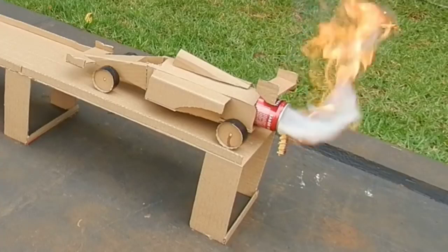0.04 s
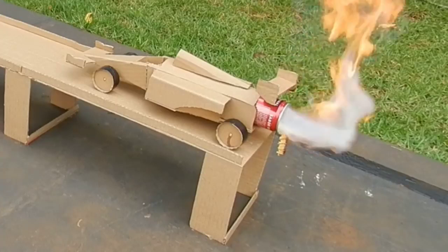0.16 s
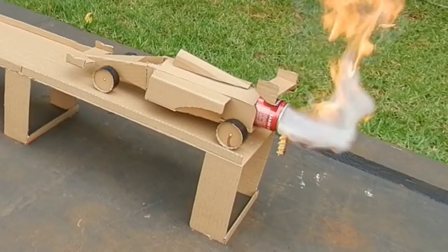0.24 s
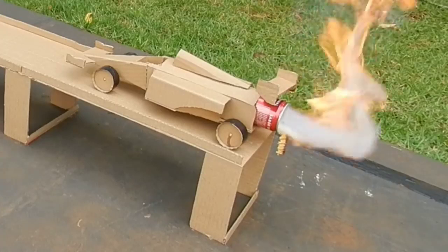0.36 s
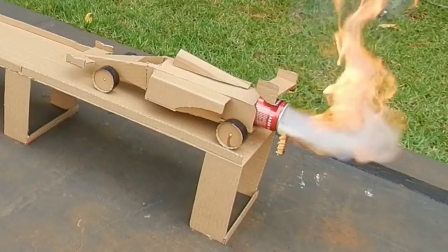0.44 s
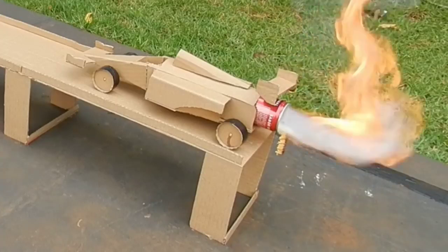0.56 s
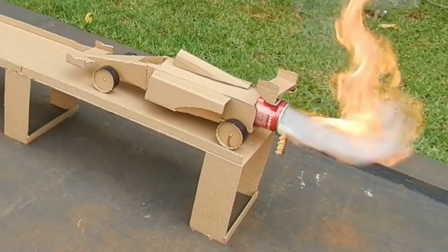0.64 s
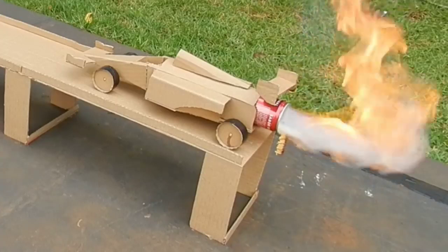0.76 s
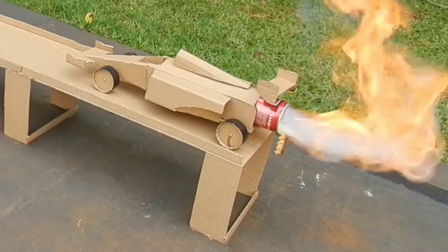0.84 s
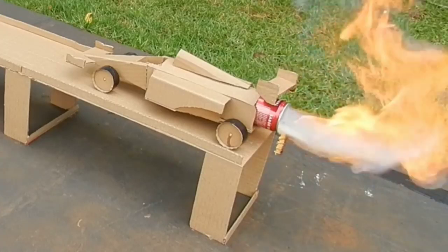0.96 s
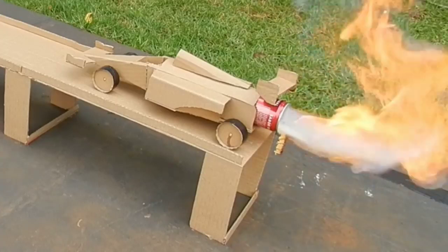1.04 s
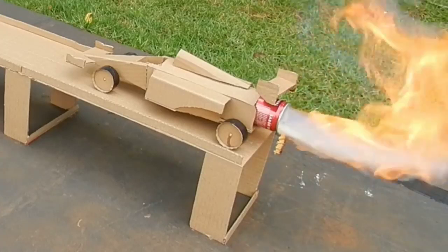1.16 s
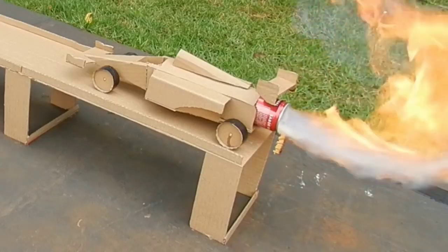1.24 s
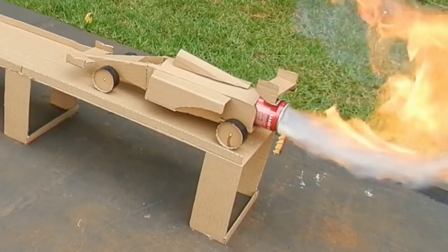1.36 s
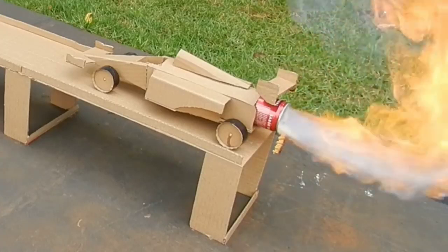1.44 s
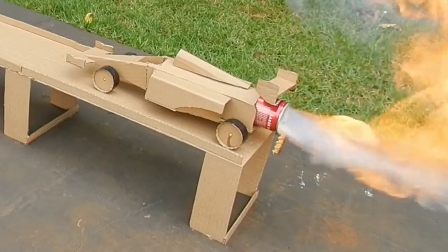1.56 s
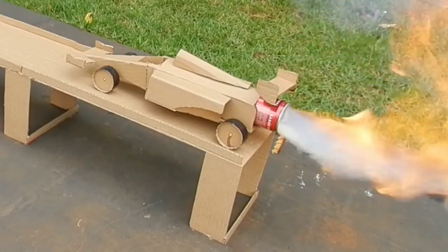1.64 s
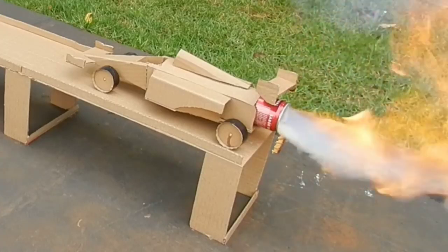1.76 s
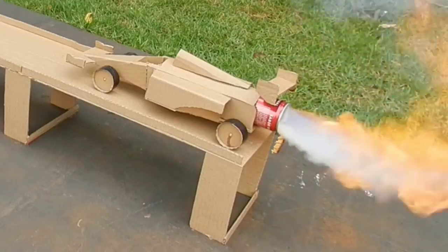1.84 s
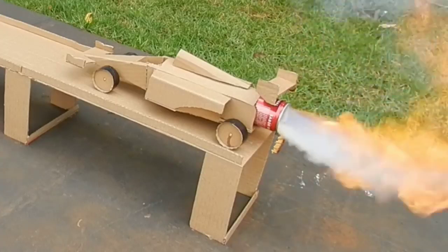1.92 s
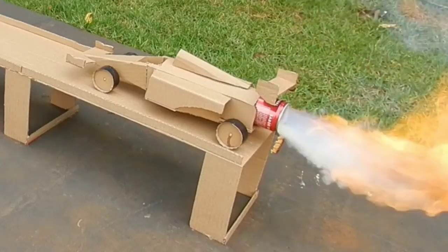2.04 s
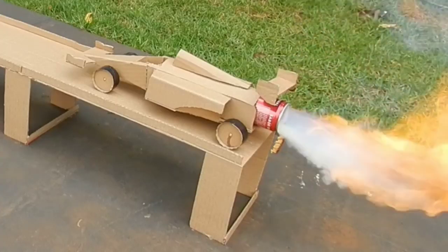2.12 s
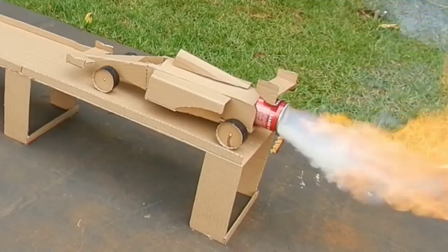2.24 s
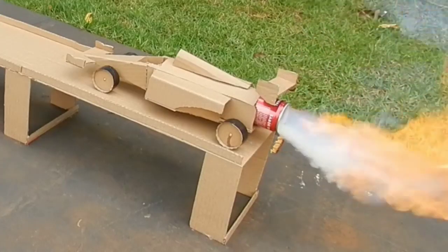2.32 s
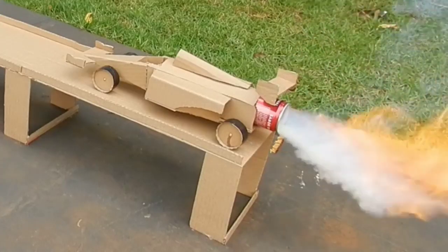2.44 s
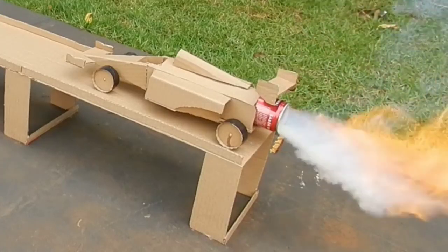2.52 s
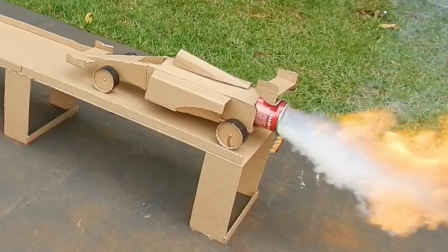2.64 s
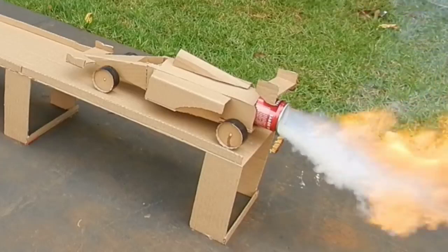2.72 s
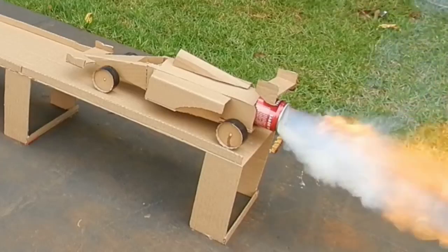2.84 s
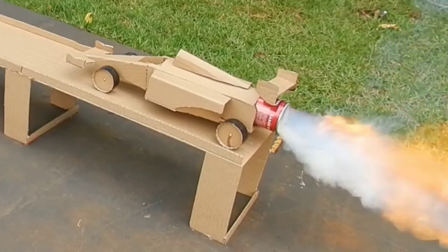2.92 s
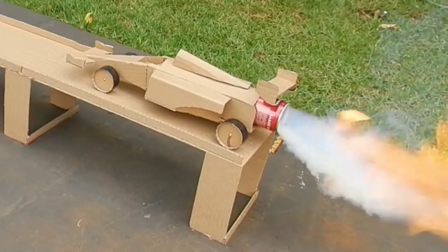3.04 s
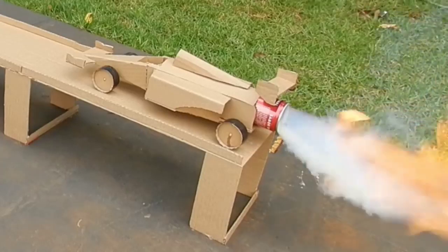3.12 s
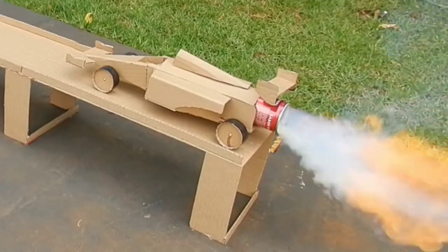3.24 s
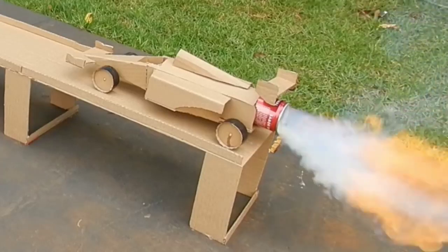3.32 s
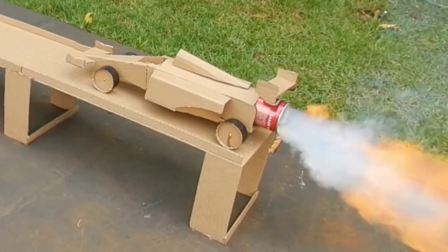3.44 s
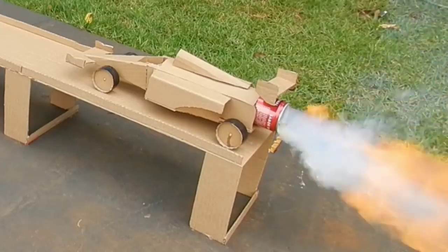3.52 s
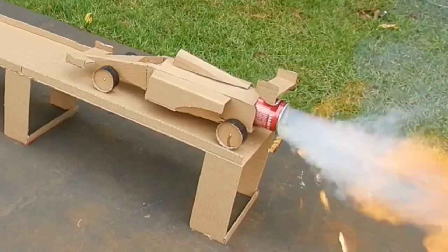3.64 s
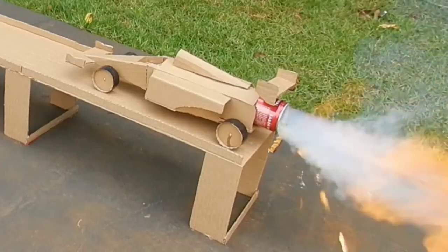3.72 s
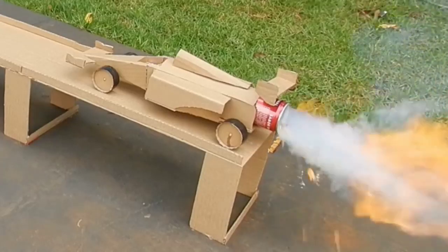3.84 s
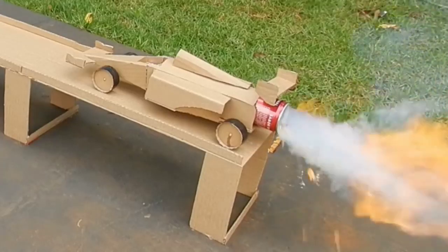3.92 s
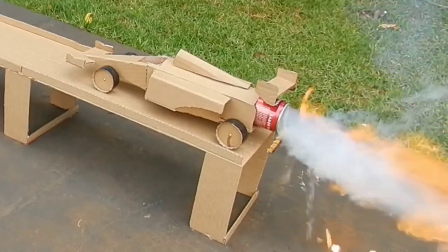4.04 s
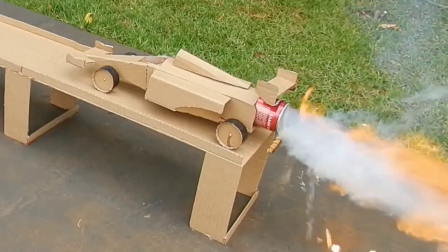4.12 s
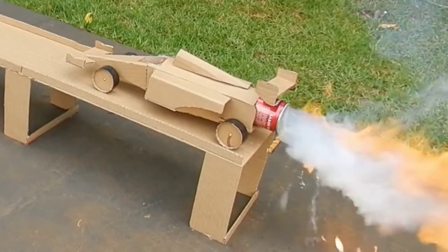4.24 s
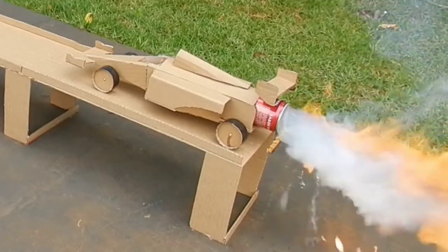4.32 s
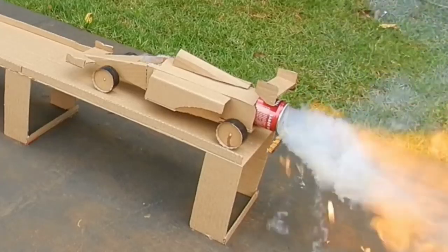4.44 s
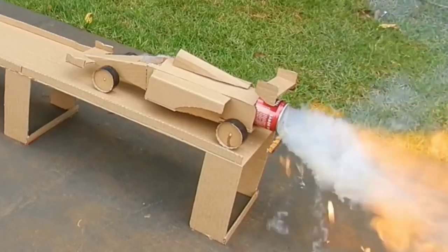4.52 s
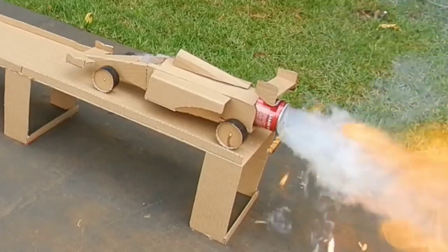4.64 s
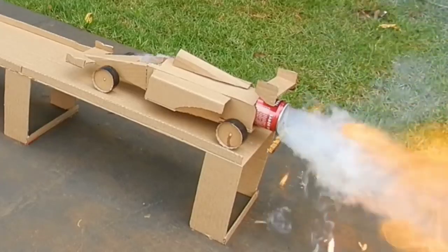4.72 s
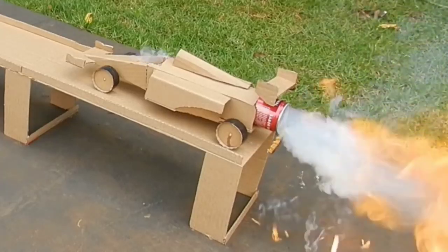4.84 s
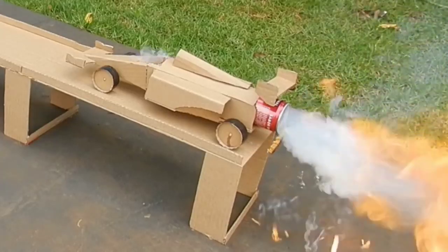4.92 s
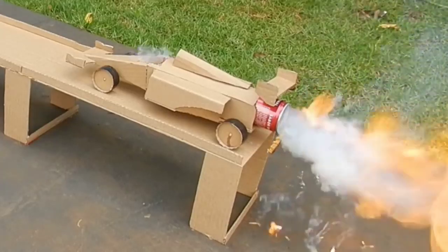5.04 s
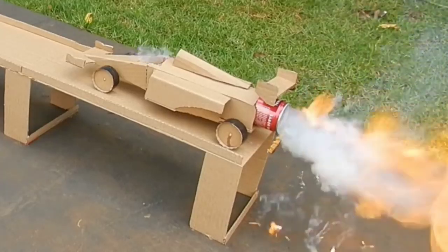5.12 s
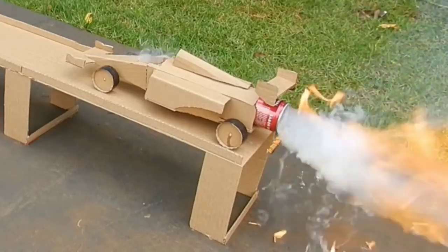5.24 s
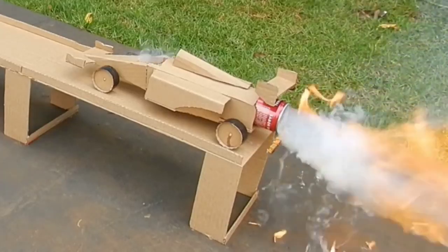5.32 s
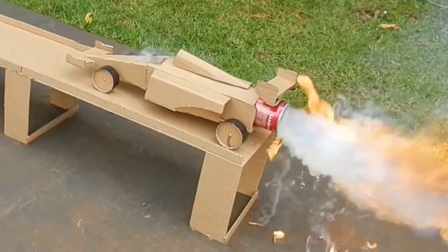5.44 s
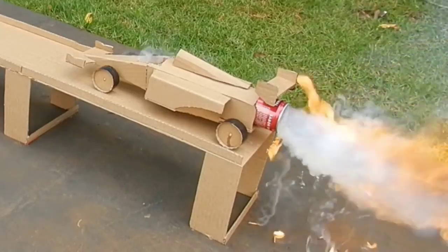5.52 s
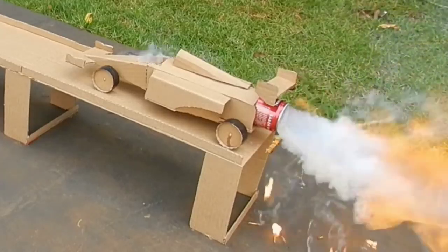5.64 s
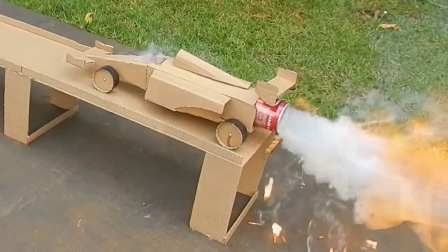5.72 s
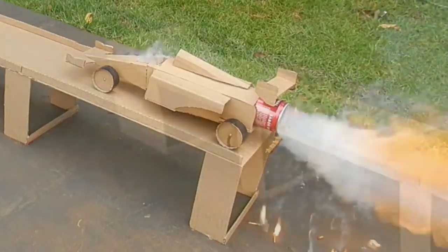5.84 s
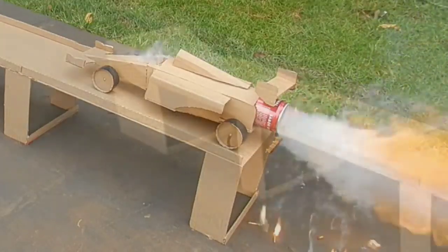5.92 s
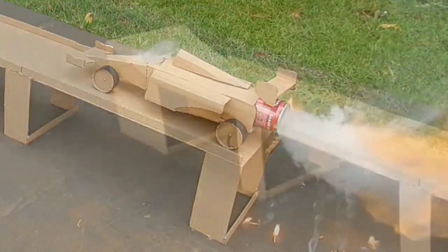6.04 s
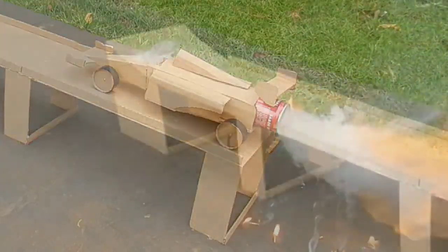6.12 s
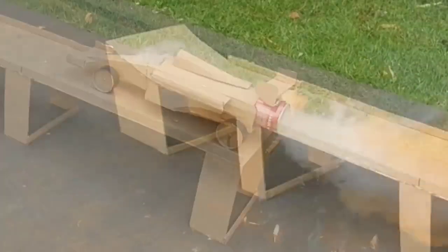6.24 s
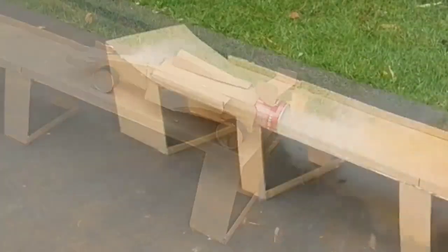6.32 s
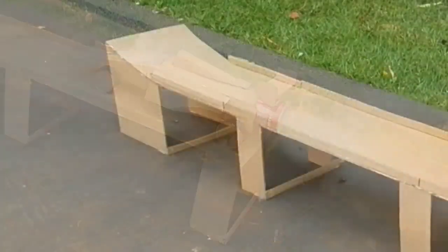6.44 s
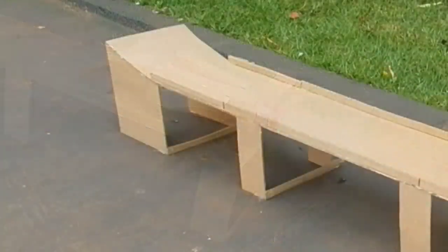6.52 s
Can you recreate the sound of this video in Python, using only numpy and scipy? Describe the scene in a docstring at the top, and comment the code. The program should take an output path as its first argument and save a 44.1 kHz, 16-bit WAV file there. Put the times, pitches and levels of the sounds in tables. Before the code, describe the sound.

A burning can's jet is heard close by in the open, slowed down: a turbulent mid-range rush, low cavity drones and a breathy note at the mouth. Flame rumble builds in irregular heavy puffs, with rare short crackles and a thin fizz on top. After peaking it fades down, then a sudden switch to faint normal-speed outdoor air carries a single dull, soft thud. Stereo microphone, dry, no echo.

```python
"""A can of burning propellant jets flame from the back of a cardboard car, outdoors, heard in slow motion.
The flame rumbles as lumps of noise; two resonances drone in the can's cavity and one breathes at its mouth.
The jet rushes as turbulent noise and spits short crackling puffs.
Slowed playback holds each sample, mirroring the roar into a thin fizz; at the end, open-air noise
cuts in at normal speed with one soft low bump."""
import sys
import numpy as np
from scipy import signal
from scipy.fft import rfft, irfft, next_fast_len
from scipy.io import wavfile
from scipy.ndimage import uniform_filter1d, map_coordinates

SR = 44100
rng = np.random.default_rng(int(sys.argv[2]) if len(sys.argv) > 2 else 0)


def log_audio(samples):
    """Write samples as a 16-bit WAV file to the path given in sys.argv[1]."""
    # one column per channel
    frames = np.atleast_2d(samples).T
    # limit to full scale, then quantise
    limited = np.clip(frames, -1, 1)
    pcm = np.round(limited * 32767).astype(np.int16)
    wavfile.write(sys.argv[1], SR, pcm)


N = 289990

# The flame catches, spreads and shrinks: (time [s], size [dB re full])
FLAME_SIZE = [(0, -22), (.8, -20), (1.15, -17.5), (1.45, -8), (1.9, -5.5), (2.45, -5.5), (3.0, -5),
              (3.5, -2), (4.7, -1.3), (5.35, -4), (5.8, -8), (6.1, -17.5), (6.44, -16)]
# The outflow builds, holds and dies away: (time [s], strength [dB re full])
OUTFLOW = [(0, -4), (.6, -1.5), (1.9, -0.76), (2.68, -0.5), (3.05, -1.5), (3.4, 0), (5.05, -1), (5.8, -4.5),
           (6.1, -9.5), (6.42, -15)]


def amp(db):
    """Amplitude ratio: twenty decibels are a factor of ten."""
    return 10 ** (np.asarray(db) / 20)


def unit(x):
    """Normalization: x scaled to rms 1."""
    return x / np.sqrt(np.mean(x ** 2) + 1e-20)


def along(points, hz):
    """Logarithmic frequency scale: each column of a (frequency, ...) table interpolated at hz."""
    f, *cols = np.transpose(points)
    return [np.interp(np.log(hz + 1), np.log(f + 1), c) for c in cols]


def curves(rows):
    """Linear interpolation in time: one value per sample for each column after the time."""
    s, *cols = np.transpose(rows)
    return [np.interp(np.arange(N) / SR, s, c) for c in cols]


def wobble(rate):
    """Slow random modulation: a smooth curve through rate random knots a second."""
    knots = rng.standard_normal(int(N * rate / SR) + 4)
    return map_coordinates(knots, [np.arange(N) * rate / SR])


def swells(rows):
    """Gaussian bumps in dB from (time, length, dB) rows; the length is the width at half height."""
    t = np.arange(N) / SR
    return sum(db * .5 ** ((2 * (t - s) / length) ** 2) for s, length, db in rows)


def filtered(x, response):
    """Linear filtering: the spectrum of x times a complex response of frequency."""
    m = next_fast_len(N + SR // 2)  # padding limits wrap-around
    return irfft(rfft(x, m) * response(np.fft.rfftfreq(m, 1 / SR)), m)[..., :N]


def noise(response):
    """Filtered white noise: an unrelated pair of joint rms 1."""
    return unit(filtered(rng.standard_normal((2, N)), response))


def coloured(spectrum):
    """Spectral density: an unrelated noise pair shaped by a (frequency, dB) table."""
    return noise(lambda hz: amp(along(spectrum, hz)[0]))


def halves(spectrum, split_hz):
    """Band splitting: noise below and noise above a crossover in one spectrum, each of rms 1."""
    colour = lambda hz: amp(along(spectrum, hz)[0])
    low = noise(lambda hz: colour(hz) / np.sqrt(1 + (hz / split_hz) ** 10))
    high = noise(lambda hz: colour(hz) / np.sqrt(1 + (split_hz / (hz + 1)) ** 10))
    return low, high


def even(x, span):
    """Level equalization: swells slower than span seconds are divided out."""
    power = uniform_filter1d(x ** 2, max(3, int(span * SR)), axis=-1)
    return unit(x / np.sqrt(np.abs(power) + .05 * np.mean(x ** 2)))


def patchy(x, depth_db):
    """Time-frequency modulation: narrow streaks of colour come and go in the noise."""
    z = signal.stft(x, nperseg=2048)[2]
    field = rng.standard_normal(z.shape[1:])
    field = uniform_filter1d(field, size=3, axis=0)  # across frequency
    field = uniform_filter1d(field, size=5, axis=1)  # along time
    return unit(signal.istft(z * amp(depth_db * unit(field)), nperseg=2048)[1][:, :N])


def resonance(centre_hz, width_hz, skirt=1.99):
    """A mode stirred by turbulence: strength and phase wander at a rate set by its bandwidth."""
    phase = 2 * np.pi * np.cumsum(centre_hz) / SR
    mean_width_hz = width_hz.mean()
    clock = np.cumsum(width_hz / mean_width_hz)  # runs faster while the mode is wider

    def stir():
        pair = noise(lambda hz: 1 / (1 + (hz / mean_width_hz) ** skirt))
        return np.array([np.interp(clock, np.arange(N), row) for row in pair])

    return unit(stir() * np.cos(phase) + stir() * np.sin(phase))


def outdoors(width=0.38, floor_db=-76):
    """Ambient noise: a partly shared stereo field jumps up and settles, over a faint steady white hiss."""
    # Open air with a hollow middle band: (frequency [Hz], density [dB per Hz])
    air_spectrum = [(24, -57), (40, -21), (80, -15), (108, -8.5), (160, -14.5), (186, -17.5), (257, -15),
                    (502, -28), (760, -31.5), (880, -24.5), (1020, -22), (1200, -29), (1500, -34.5),
                    (2000, -41.5), (3390, -48.5), (5160, -50), (15000, -64.5)]
    # Its jump and settling: (time [s], level [dB])
    air_level = [(6.44, -62), (6.447, -38), (6.48, -39.5), (6.5, -41), (6.58, -44.5)]
    air_db, = curves(air_level)
    mid, side = even(coloured(air_spectrum), span=.03)
    air = amp(air_db) * np.array([mid + width * side, mid - width * side])
    return air + amp(floor_db) * rng.standard_normal((2, N))


def thump(s=6.474, length=0.017, hz=135, db=-34):
    """A tone burst: a sine under a Gaussian envelope gives one soft low bump in the open air."""
    t = np.arange(N) / SR - s
    return amp(db) * .5 ** ((2 * t / length) ** 2) * np.sin(2 * np.pi * hz * t)


def sparks(rise=0.0022, octaves=.5, crackle_db=3):
    """Exponential decay: each burning lump leaves with a crackling band-limited puff."""
    # Lumps spat out of the can: (time [s], level [dB], life to fade by 20 dB [s], centre [Hz])
    spits = [(1.29, -48, 0.15, 1900), (2.033, -41, .06, 720), (3.598, -49, .04, 2400),
             (3.972, -37, 0.03, 1700), (4.293, -39, 0.031, 2870), (5.048, -48, 0.16, 2200)]
    t = np.arange(N) / SR
    puffs = np.zeros((2, N))
    for s, db, life, centre_hz in spits:
        age = np.maximum(t - s, 0)
        colour = noise(lambda hz: np.exp(-.5 * (np.log2((hz + 1) / centre_hz) / octaves) ** 2))
        envelope = amp(db - 20 * age / life) * (1 - np.exp(-age / rise))
        puffs += envelope * colour
    return puffs * unit(amp(crackle_db * wobble(700)))


def nozzle(note_db=-50, width_hz=48):
    """Flow-excited resonance: gas rushing past the rim blows a breathy note that dips, then climbs."""
    # The hollow note at the can's mouth: (time [s], pitch [Hz])
    mouth_pitch = [(0, 692.3), (2.1, 676.4), (3.0, 700.6), (3.8, 735), (6.4, 741.3)]
    note = resonance(curves(mouth_pitch)[0], np.full(N, width_hz))
    return amp(note_db + 2.3 * curves(OUTFLOW)[0]) * even(note, span=0.25)


def can(low_cut_hz=165):
    """Cavity resonance: hotter gas raises both modes, and a bigger flame broadens them."""
    # Cavity modes at full flame: (frequency [Hz], width [Hz])
    cavity_modes = [(245, 36), (387, 45)]
    # The lower mode, before the low cut: (time [s], level [dB])
    lower_level = [(0, -40.5), (.35, -38), (.8, -37.5), (1.55, -33), (1.78, -35.5), (2.05, -30.5),
                   (2.5, -33.5), (2.7, -29.5), (2.93, -33.5), (3.22, -28), (3.9, -31.5), (4.55, -32.5),
                   (5.1, -31), (5.27, -35.5), (5.5, -33.5), (5.85, -41), (5.98, -37), (6.42, -43.5)]
    # The upper mode, before the low cut: (time [s], level [dB])
    upper_level = [(0, -39.5), (.83, -39.5), (1.02, -35), (1.7, -38), (1.9, -40), (2.15, -41), (2.32, -35),
                   (2.5, -41), (2.7, -35), (2.9, -40.5), (3.7, -37.5), (4.2, -42), (4.9, -42), (5.8, -46),
                   (6.42, -55.5)]
    heat_rise, blur = .0021, .025  # share of pitch, and log widening, per dB of flame
    size_db, = curves(FLAME_SIZE)
    drone = np.zeros(N)
    for (hz, width_hz), level in zip(cavity_modes, [lower_level, upper_level]):
        mode = resonance(hz * (1 + heat_rise * size_db), width_hz * np.exp(blur * size_db))
        drone = drone + amp(curves(level)[0]) * even(mode, span=0.18)
    return filtered(drone, lambda hz: 1 / np.sqrt(1 + (low_cut_hz / (hz + 1)) ** 16))


def jet(roar_db=-41.5, hiss_db=-47.5, hiss_growth=0.94, flutter_db=0.32):
    """Turbulent mixing: coarse eddies roar and fine ones hiss with the outflow; uneven burning shakes both."""
    # The jet's colour: (frequency [Hz], density [dB per Hz])
    rush_spectrum = [(150, -11.5), (500, -3.5), (730, -3), (820, -9.5), (1000, -5.5), (1220, -7.5),
                     (1440, -5.5), (1700, -14.5), (2050, -9.5), (2220, -22), (2340, -15), (2750, -16),
                     (3000, -14.5), (3300, -18.5), (4000, -24.5), (4500, -27)]
    # The jet turns sharper or duller for a while: (time [s], length [s], extra hiss [dB])
    surges = [(.25, .5, 1), (1.35, 0.58, 2), (2.1, .3, -0.9), (3.55, 0.39, 0.5), (4.1, 0.72, 1.5)]
    burn_db, = curves(OUTFLOW)
    coarse, fine = halves(rush_spectrum, split_hz=1604)
    shake = amp(flutter_db * wobble(25))
    roar = amp(roar_db + burn_db) * even(patchy(coarse, depth_db=1.5), span=0.2)
    hiss_level = amp(hiss_db + hiss_growth * burn_db + swells(surges))
    hiss = hiss_level * even(patchy(fine, depth_db=2.5), span=0.15)
    return shake * (roar + hiss)


def flame(deep_db=-24.5, upper_db=-31.5, upper_growth=0.57, gust_db=1.15):
    """Combustion noise: eddies of burning gas push the air in slow lumps, deeper as the flame grows."""
    # The rumble's colour: (frequency [Hz], density [dB per Hz])
    rumble_spectrum = [(8, -42), (15, -3), (28, 1.5), (40, -1), (52, -5.5), (70, -3.5), (95, -8.5),
                       (115, -14), (150, -14), (178, -26.5), (240, -50), (400, -120)]
    # The flame billows out or slackens:
    # (time [s], length [s], extra deep rumble [dB], extra upper rumble [dB])
    billows = [(.97, .17, 6.5, 5), (1.158, .1, 1, 4), (1.623, 0.15, 5.5, -4), (1.827, 0.22, 1.5, 3),
               (2.196, .2, 3.5, 1), (2.4, .16, -0.5, -4.5), (2.725, 0.28, 5, 3), (2.98, 0.13, -1, -2.5),
               (3.228, 0.2, 7, 0.5), (3.542, 0.17, 6.5, 3.5), (3.813, .09, 8.5, 5), (3.92, 0.12, -2, 4.5),
               (4.02, 0.085, 3.5, -3.5), (4.205, .1, 3, 4.5), (4.47, 0.13, 7, 5.5), (4.706, 0.1, 7.5, 4),
               (4.98, 0.045, 8, 1.5), (5.174, 0.04, 6.5, -1), (5.86, 0.15, 8.5, -0.5), (6.438, 0.058, 5, 0)]
    size_db, = curves(FLAME_SIZE)
    deep_puffs_db = swells([(s, length, db) for s, length, db, _ in billows]) + gust_db * wobble(8.9)
    upper_puffs_db = swells([(s, length, db) for s, length, _, db in billows]) + gust_db * wobble(9.8)
    deep, upper = halves(rumble_spectrum, split_hz=58.2)
    deep_level = amp(deep_db + size_db + deep_puffs_db)
    upper_level = amp(upper_db + upper_growth * size_db + upper_puffs_db)
    return deep_level * even(deep, span=0.065) + upper_level * even(upper, span=0.1)


def microphones(pair):
    """Interaural-style coherence: bass arrives nearly alike at both ports, treble mostly unrelated."""
    # The motor at the two microphones:
    # (frequency [Hz], left-right balance [dB], likeness [0-1], left lead [rad])
    port_cues = [(50, 4.5, 1, -0.26), (243, 2.5, 0.87, 0.5), (414, 0.5, 1, -1), (690, -5.5, 0.89, -1.33),
                 (1020, -9, 0.9, -1.6), (1120, -13, 0.56, -0.4), (1394, -11.5, 0, -4.5),
                 (2100, -5.5, 0.17, -5), (3200, 1, 0, -4.5), (4100, 6, 0.62, -6)]

    def port(sign):
        def response(hz):
            balance_db, alike, lead = along(port_cues, hz)
            turn = np.arccos(np.clip(alike, 0, 1)) / 2  # mixing angle that gives this likeness
            gain = np.sqrt(2 / (1 + amp(-sign * balance_db) ** 2)) * np.exp(.5j * sign * lead)
            return gain * np.array([np.cos(turn), sign * np.sin(turn)])
        return filtered(pair, response).sum(axis=0)

    return np.array([port(1), port(-1)])  # left, right


def slow_motion(x, haze_db=-63.5):
    """Sample-and-hold imaging: held samples mirror the dull slowed sound on both sides of the hold rate."""
    # A faint haze above the roar: (frequency [Hz], density [dB per Hz])
    haze_spectrum = [(3000, -48), (4400, 0.5), (7500, 2), (11000, -5.5), (16000, -42)]
    slow_top_hz, hold_hz, slow_end_s = 4330, 12000, 6.447
    dull = filtered(x, lambda hz: hz < slow_top_hz)
    samples = signal.resample_poly(dull, hold_hz, SR, axis=1)
    steps = np.repeat(samples, 4, axis=1)
    held = signal.resample_poly(steps, SR, 4 * hold_hz, axis=1, window=("kaiser", 8))[:, :N]
    # the haze swells and fades with the outflow
    haze = amp(curves(OUTFLOW)[0] + haze_db) * patchy(coloured(haze_spectrum), depth_db=4.5)
    fade = np.clip((slow_end_s - np.arange(N) / SR) / .005, 0, 1)
    return (held + haze) * fade


def scene():
    """Superposition: the slowed motor, then the open air."""
    motor = microphones(flame() + can() + nozzle() + jet() + sparks())
    return slow_motion(motor) + outdoors() + thump()


def record(dry):
    """Band limiting: the camera keeps nothing from 15.7 kHz up."""
    return filtered(dry, lambda hz: hz < 15700)


dry = scene()
out = record(dry)
log_audio(out)
```